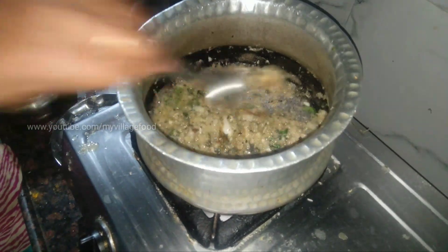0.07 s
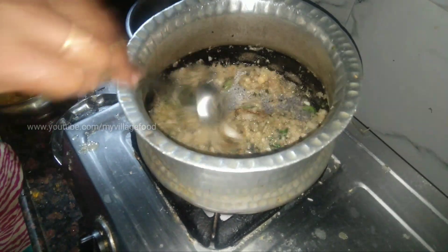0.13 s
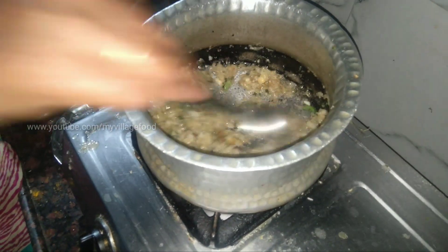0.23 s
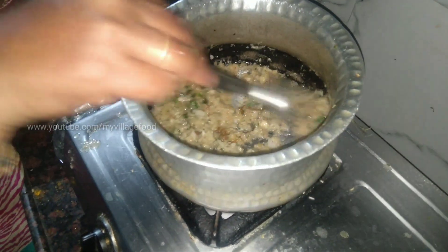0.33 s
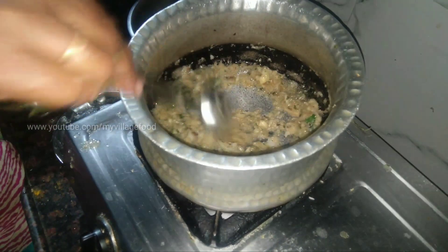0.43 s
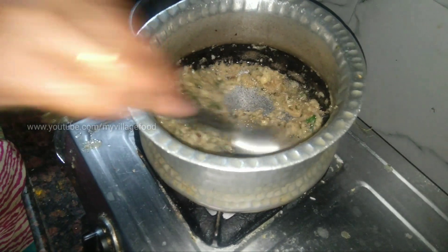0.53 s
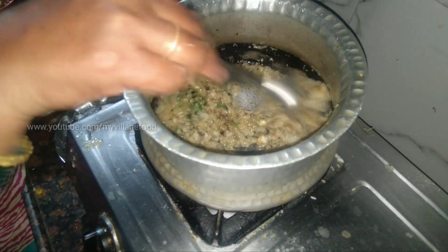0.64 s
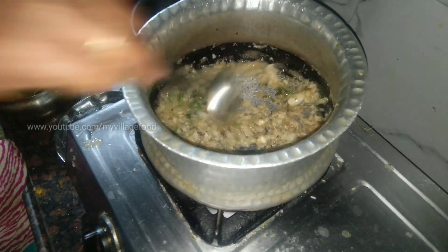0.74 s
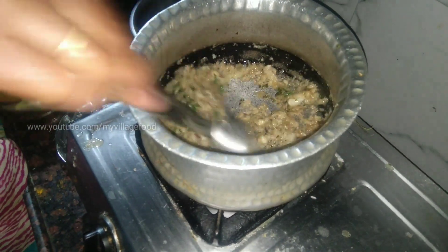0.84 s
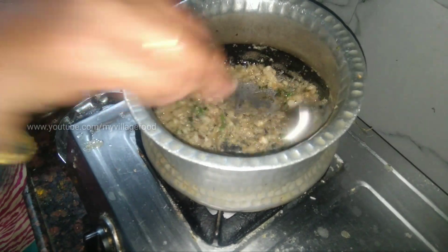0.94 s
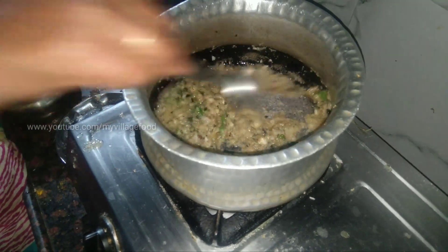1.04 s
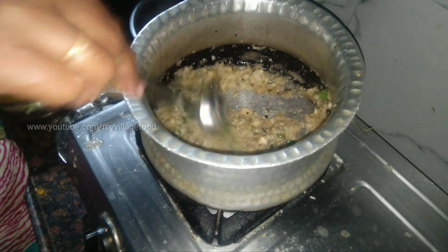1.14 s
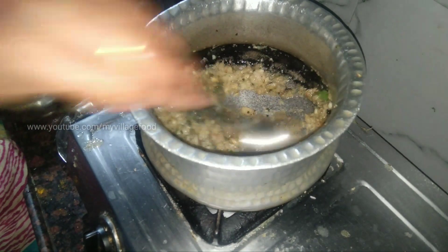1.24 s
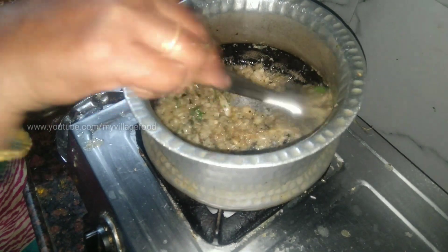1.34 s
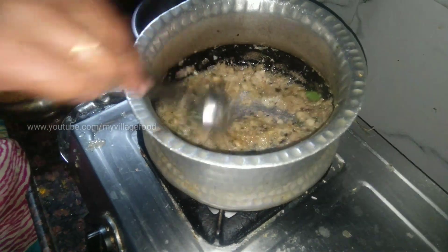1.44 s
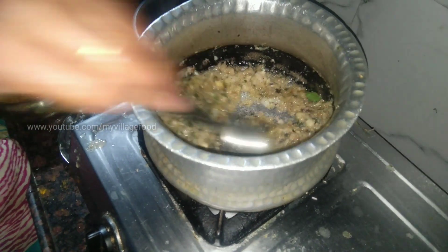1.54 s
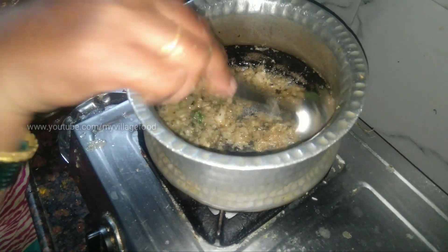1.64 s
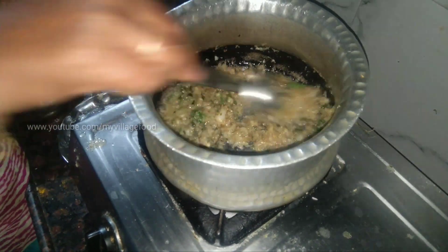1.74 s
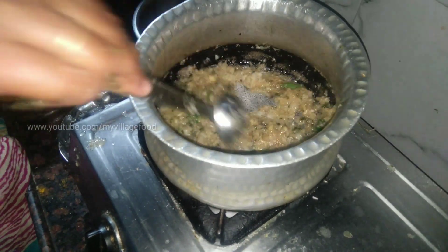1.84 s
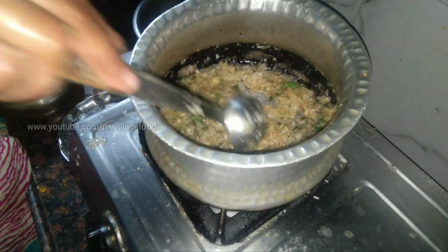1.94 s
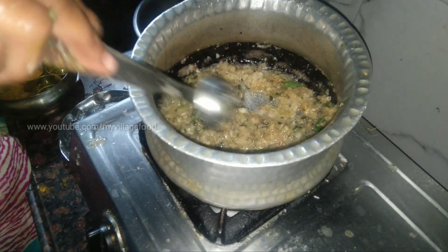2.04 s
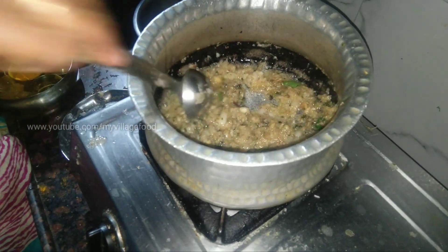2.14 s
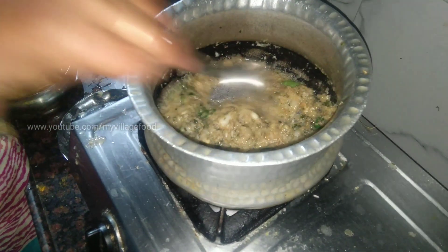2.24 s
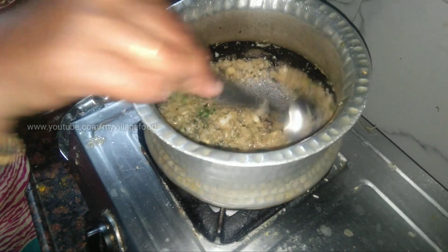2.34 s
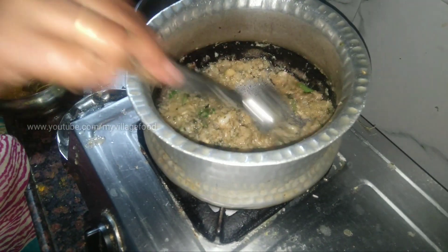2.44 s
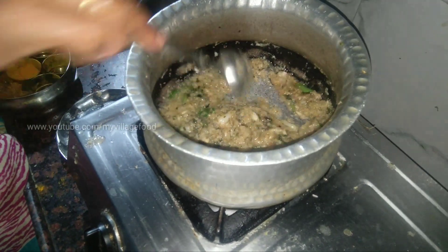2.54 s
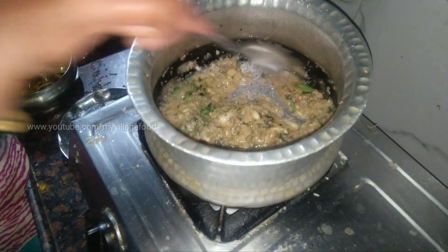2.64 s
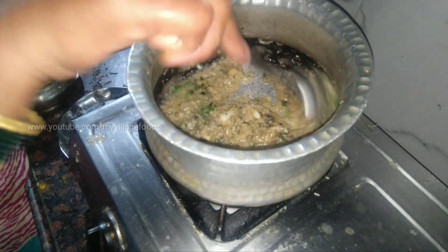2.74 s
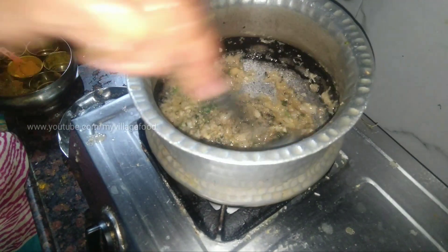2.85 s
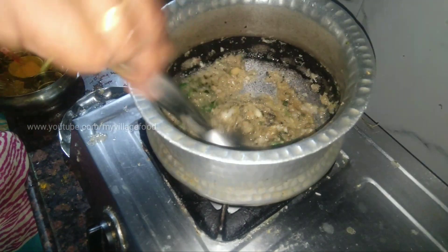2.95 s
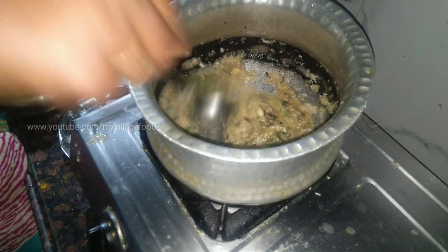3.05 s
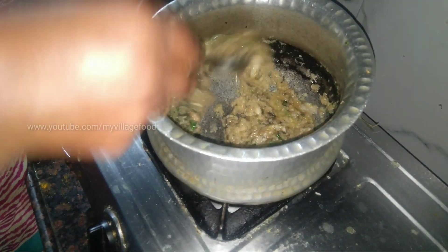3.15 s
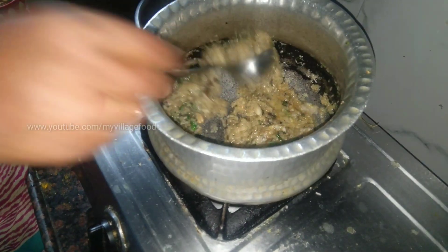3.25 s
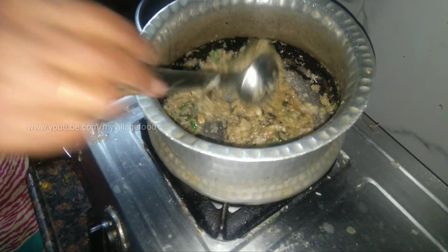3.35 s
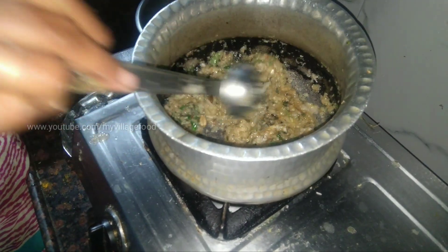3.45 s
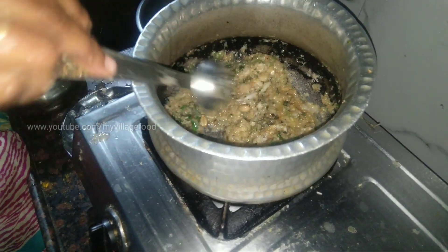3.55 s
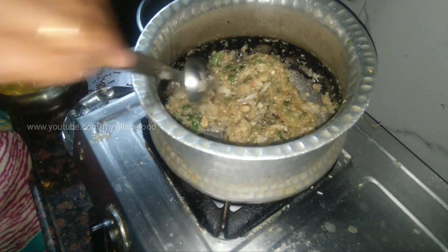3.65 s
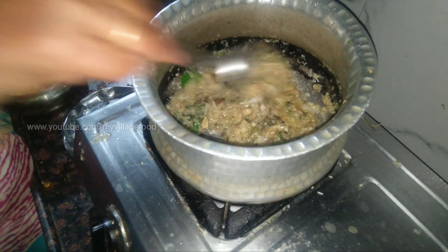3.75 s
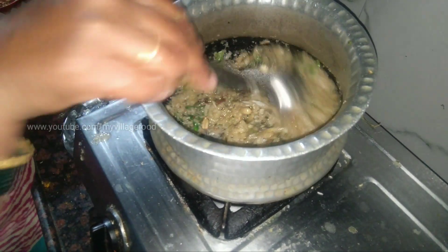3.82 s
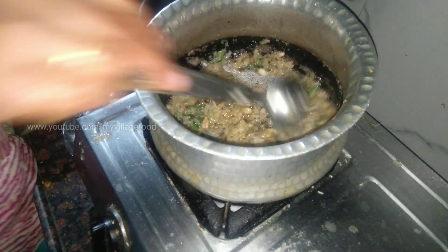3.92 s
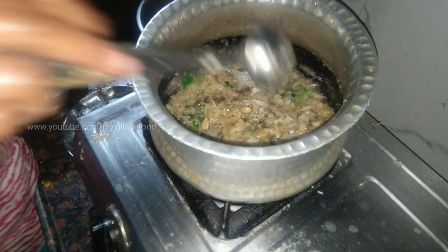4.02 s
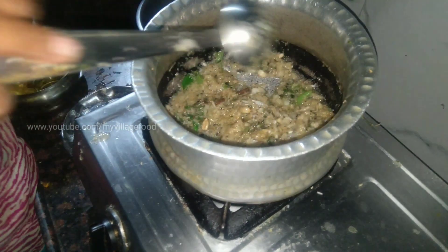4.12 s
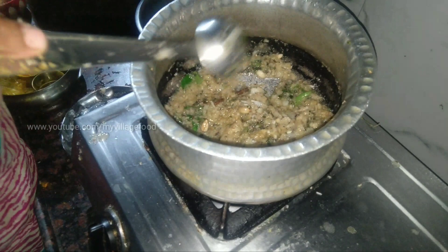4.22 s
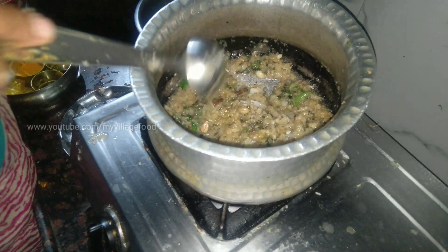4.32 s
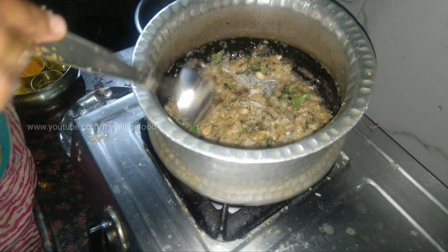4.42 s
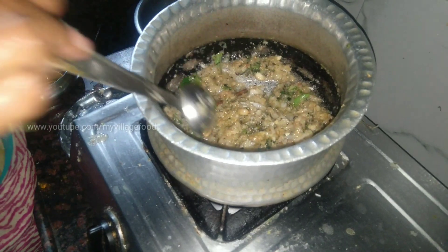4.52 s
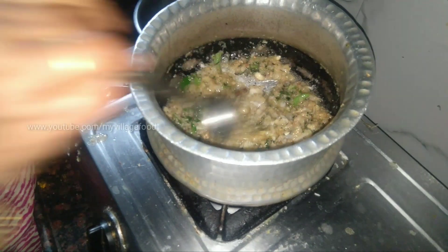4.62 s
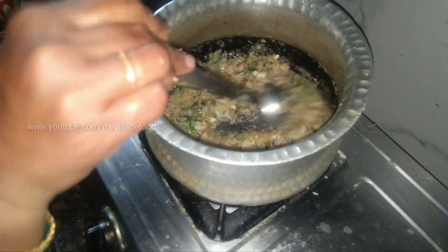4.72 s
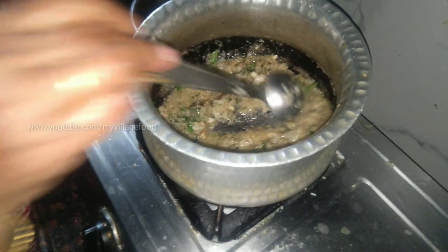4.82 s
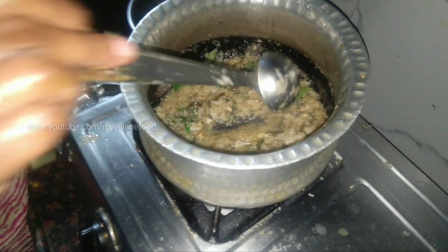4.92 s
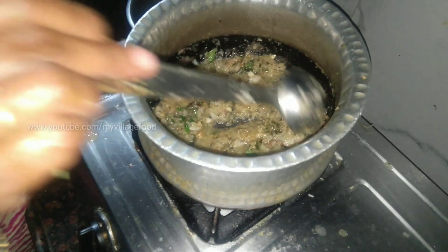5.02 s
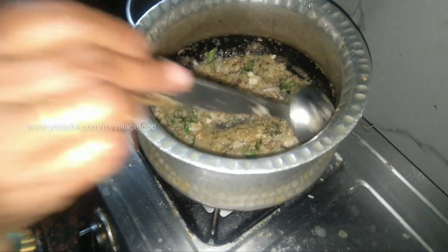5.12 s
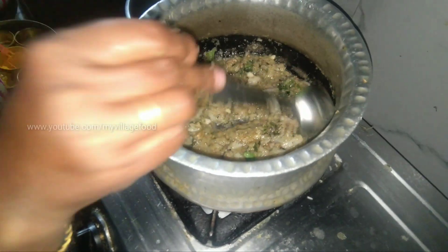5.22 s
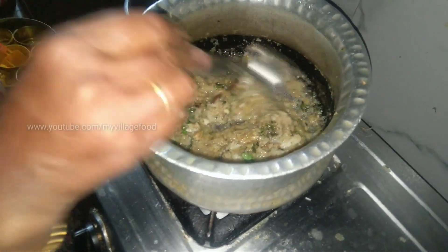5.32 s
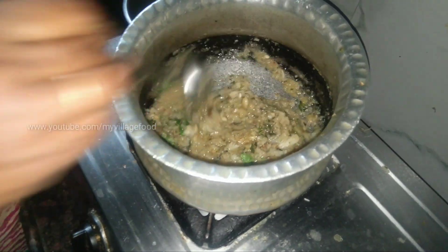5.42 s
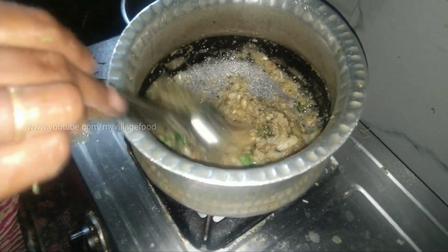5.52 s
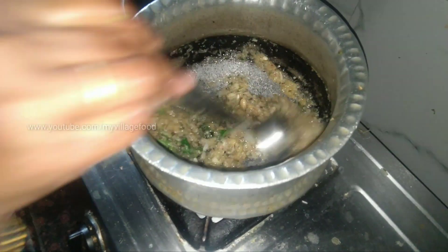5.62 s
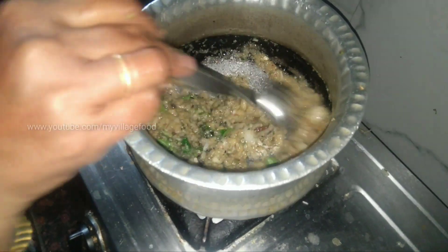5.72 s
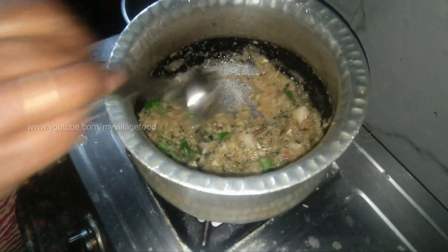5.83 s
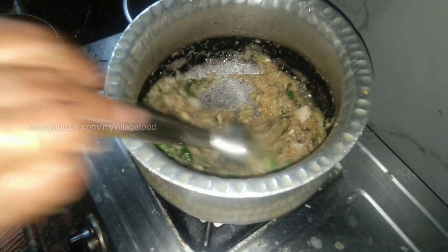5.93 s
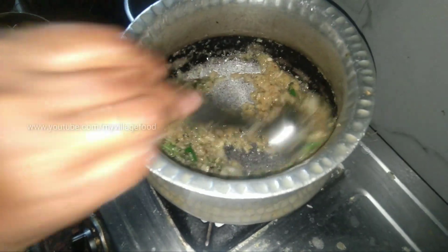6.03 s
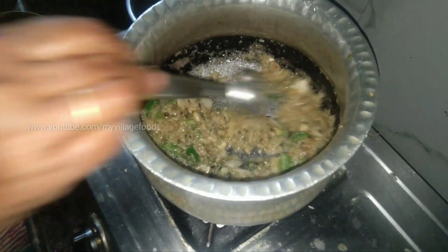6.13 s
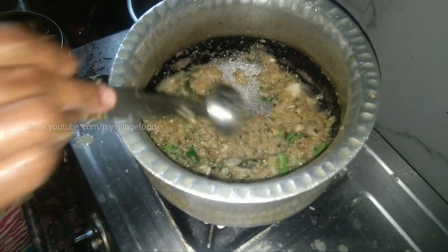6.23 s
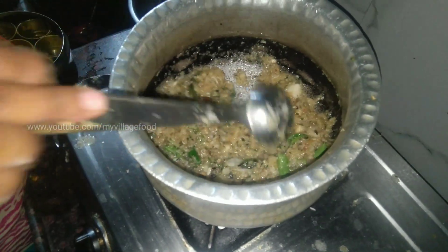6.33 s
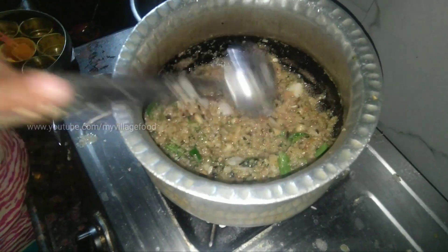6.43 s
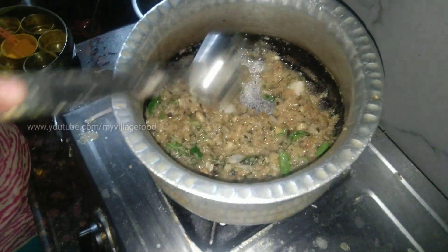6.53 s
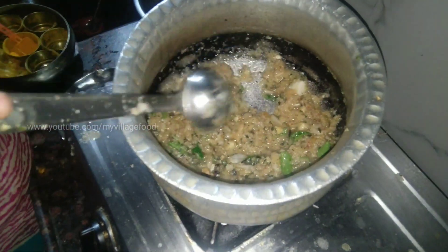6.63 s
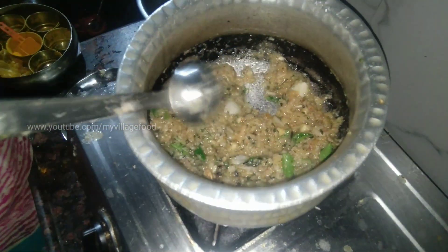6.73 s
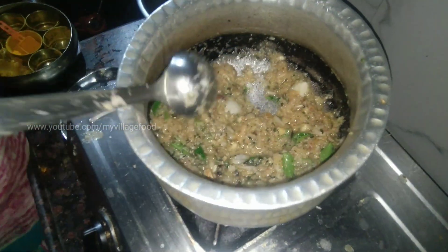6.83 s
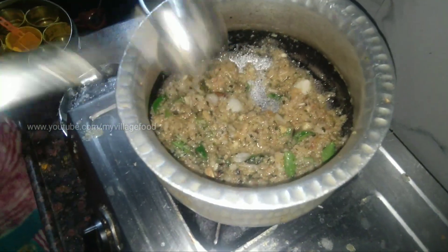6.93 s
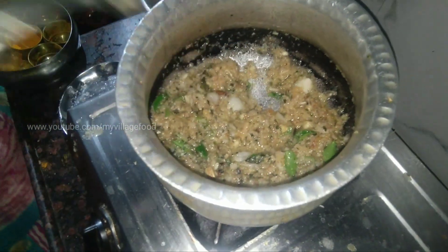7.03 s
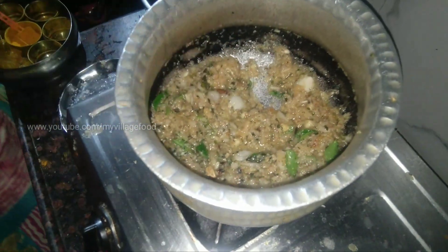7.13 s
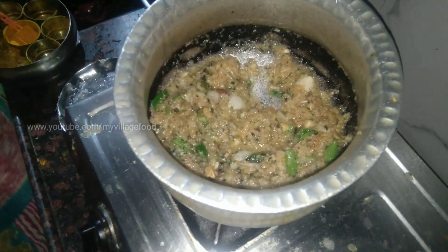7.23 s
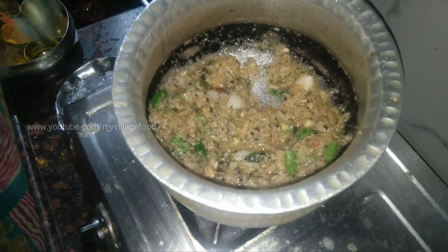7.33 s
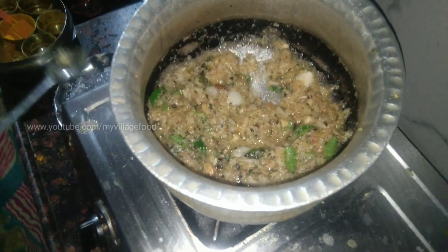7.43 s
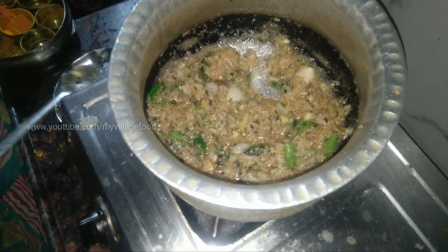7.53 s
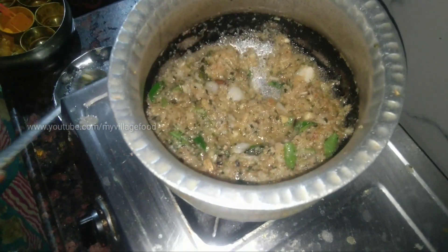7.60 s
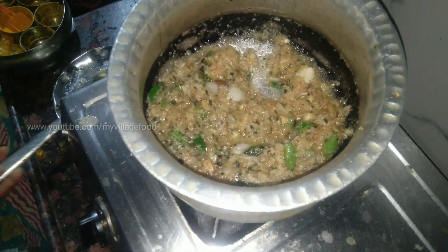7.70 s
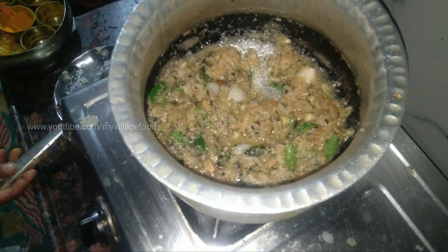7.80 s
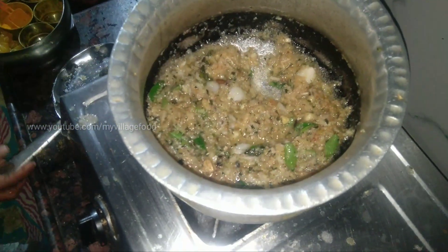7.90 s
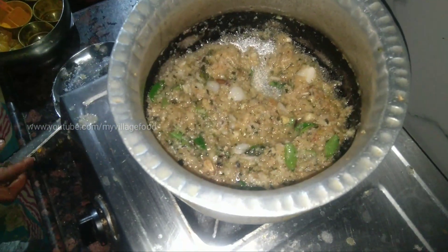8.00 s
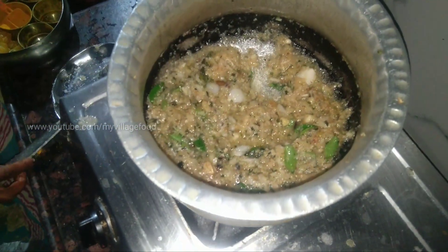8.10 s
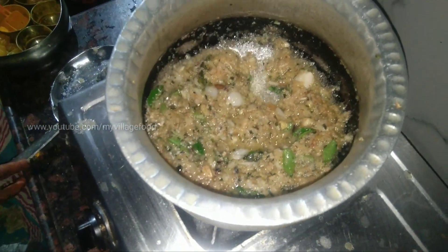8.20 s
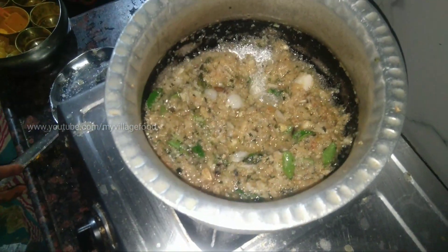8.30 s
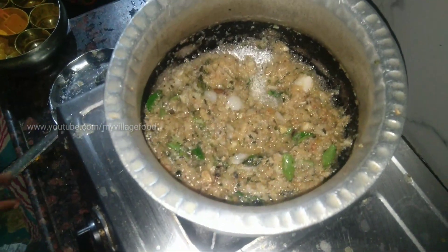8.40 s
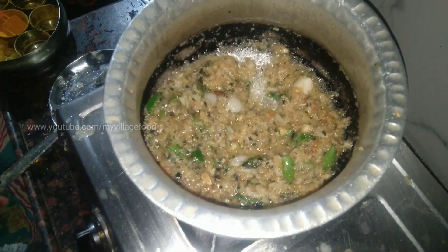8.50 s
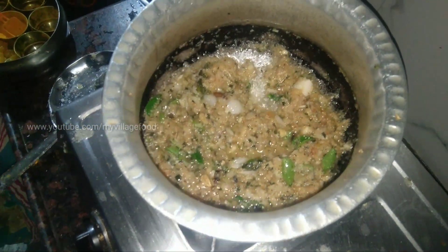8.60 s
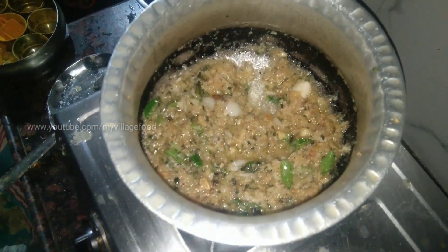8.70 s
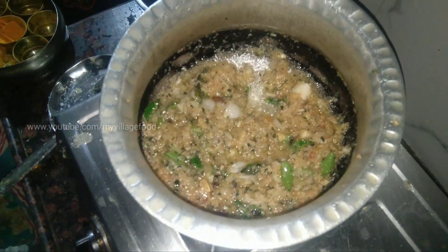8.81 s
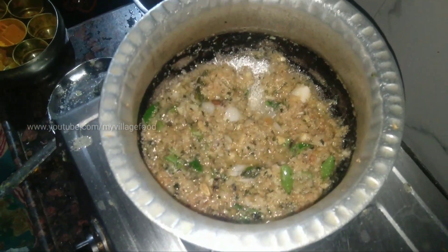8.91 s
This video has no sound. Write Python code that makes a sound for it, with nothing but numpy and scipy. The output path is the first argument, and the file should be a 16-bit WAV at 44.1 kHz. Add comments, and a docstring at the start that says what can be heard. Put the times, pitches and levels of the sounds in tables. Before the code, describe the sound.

A steel ladle stirs spice paste in a thick aluminium pot, heard close up in a small kitchen. For the first two seconds, quick gritty scrapes chatter over the pot bottom with light knocks, above a soft, hollow sizzle of oil. The strokes then become sparser, with firm, briefly ringing knocks at about 2.3, 2.7 and 3.7 seconds, and clinks and a hard knock around 4.6. The sizzle dips and flares as the paste is turned. Busier scraping returns from 5.4 to 6.3 seconds, with a bright clank near 5.5 and a dull thump near 5.9. A last quick clatter comes at about 6.9 seconds, and the stirring dies away. Faint sizzling continues to the end at about nine seconds, with a soft low thump near 8. Underneath, a faint, uneven low rumble comes and goes throughout.

```python
"""A steel ladle scrapes through sizzling spice paste in a thick aluminium pot on a gas stove.
The microphone is close to the pot, in a small kitchen. The ladle's edge chatters on the loaded bottom
and rasps through the paste; its blows knock the pot and ring the free rim and the ladle itself.
Steam bubbles fizz in the oil, coloured by the hollow of the pot. Underneath, a low rumble with a few
soft thumps comes and goes."""
import sys
import numpy as np
from scipy import signal
from scipy.io import wavfile
from scipy.ndimage import uniform_filter1d

SR = 44100
rng = np.random.default_rng(int(sys.argv[2]) if len(sys.argv) > 2 else 0)


def digitize_waveform(pressure):
    """Quantize a signal to 16-bit integers and store it at the path in sys.argv[1].

    Rows of a 2-D input are taken as channels; values are limited to [-1, 1].
    """
    field = np.atleast_2d(pressure).T
    bounded = np.clip(field, -1, 1)
    quanta = np.round(bounded * 32767).astype(np.int16)
    wavfile.write(sys.argv[1], SR, quanta)


N = 395125

# modes of the loaded pot bottom and wall: pitch_hz, level_db, t60_s
POT_MODES = [(205, -17.5, 0.11), (175.6, -18.5, 0.6), (250, -21, 0.057), (306.2, -0.5, 0.19),
             (353.2, 7, 0.11), (409.4, 4, .11), (472, -4, .14), (533.2, 6, 0.13), (600, 12, 0.056),
             (638, -5, 0.093), (650, -3.5, 0.044), (796, -6.5, 0.15), (880, -21, 0.14), (1260, -39, 0.2),
             (1420, -32, 0.17), (1890, -15, 0.18), (2200, -35, 0.13), (2610, -17, 0.13), (3120, -18, .2)]
# ladle blows: start_s, knock_db, rim_hum_db, rim_ring_db, bowl_db, handle_db, crack_db,
# place_rad, bounce_s, mute_after_s
LADLE_BLOWS = [ (.313, -9.5, -41, -55, -70, -44, -41, .62, .013, .065),
               (.476, -18, -40, -57, -70, -60, -36, .73, .0056, .1),
               (.798, -19, -50, -38, -60, -56, -55, .64, .0076, .05),
               (1.006, -24, -47, -46, -65, -65, -47, .98, .007, .1),
               (1.358, -11.5, -47, -47, -66, -57, -45, .69, .011, .078),
               (1.571, -24, -45, -55, -70, -66, -50, .7, .006, .08),
               (1.703, -21, -45, -45, -70, -62, -40, .6, .0098, .1),
               (1.821, -14.5, -39, -48, -67, -66, -50, .72, .0092, .13),
               (2.299, -4.5, -26, -44, -42.5, -56, -31.5, .8, .013, .09),
               (2.703, -5, -33, -49, -58, -70, -36, .58, .012, .084),
               (2.858, -19.5, -41, -54, -70, -72, -45, .53, .011, .085),
               (2.921, -16.5, -49, -64, -70, -72, -57, .62, .0071, .09),
               (2.963, -19.5, -41, -60, -70, -61, -52, .66, .0086, .13),
               (3.743, -4.5, -26.5, -50, -53, -72, -33, .75, .016, .05),
               (4.547, -23, -22.5, -75, -31, -31, -24.5, .61, .006, .05),
               (4.589, -23, -29.5, -70, -38.5, -54, -31, .88, .0043, .04),
               (4.7, -1.5, -27, -46, -63, -45, -26, .8, .0013, .077),
               (5.233, -35, -29, -88, -75, -78, -58, .37, .0059, .09),
               (5.339, -18.5, -38, -70, -81, -78, -56, .94, .0084, .1),
               (5.432, -27, -48, -55, -70, -66, -42, .7, .005, .06),
               (5.454, -14, -18, -25.5, -36, -50.5, -20.5, .37, .002, .049),
               (5.466, -7, -21, -33, -58, -50, -30, .61, .0019, .126),
               (5.603, -22, -37, -48, -70, -64, -49, .56, .0071, .19),
               (5.819, -18.5, -35, -50, -62, -59, -46, .8, .0053, .13),
               (5.89, -12.5, -35, -60, -65, -59, -47, .52, .0018, .14),
               (6.186, -20, -42, -42, -51, -60, -50, .96, .0089, .08),
               (6.837, -6.5, -17, -46, -41.5, -25.5, -16, .8, .011, .08),
               (6.871, -14.5, -34, -38, -58, -48, -33, .44, .008, .087),
               (6.888, -20.5, -40, -39, -67, -63, -30, .9, .0035, .076),
               (6.915, -17, -43, -59, -76, -62, -38, .47, .003, .09),
               (6.991, -25, -33.5, -72, -70, -70, -52, .72, .0044, .11),
               (7.724, -39, -52, -66, -66, -75, -54, .72, .0038, .063)]


def gain_of(db):
    return 10 ** (np.asarray(db) / 20)


def unit_rms(x):
    return x / np.sqrt(np.mean(x ** 2) + 1e-20)


def level_at(spectrum, hz):
    """Level in dB at hz, between (pitch_hz, level_db) points on a log frequency axis."""
    pitch_hz, level_db = np.transpose(spectrum)
    return np.interp(np.log(hz + 1), np.log(pitch_hz + 1), level_db)


def curves(table, t):
    """The columns after a table's time column, read at times t."""
    times, *columns = np.transpose(table)
    return [np.interp(t, times, column) for column in columns]


def slow(rule):
    """A slow control, worked out every millisecond and stretched to every sample."""
    grid = np.arange(0, N / SR + .002, .001)
    return np.interp(np.arange(N) / SR, grid, rule(grid))


def add(mix, start_s, sound):
    part = mix[round(start_s * SR):][:len(sound)]
    part += sound[:len(part)]


def swell_db(t, peak_s, rise_s, fall_s):
    """A round-topped swell, 10 dB down at rise_s before its peak and at fall_s after."""
    return -10 * np.maximum((peak_s - t) / rise_s, (t - peak_s) / fall_s) ** 1.45


def ring(modes, drive_db=0, place=0, t60_scale=1, size=7000):
    """Dying sines of a struck object; the place of the blow weights each mode."""
    hz, db, t60 = np.transpose(modes)[:, :, None]
    t = np.arange(size) / SR
    weight = gain_of(db + drive_db) * np.cos(place * np.arange(len(modes)))[:, None]
    return (weight * gain_of(-60 * t / (t60 * t60_scale)) * np.sin(2 * np.pi * hz * t)).sum(0)


def noise(colour_db, patchy_db, flicker_db, size):
    """Unit-level noise shaped by colour_db(hz, t), with narrow lasting patches and a broad flicker."""
    hop = size // 4
    frames, hz = N // hop + 5, np.fft.rfftfreq(size, 1 / SR)[:, None]
    real, imag, patches = rng.standard_normal((frames, len(hz), 3)).T
    patches = unit_rms(uniform_filter1d(uniform_filter1d(patches, size=4, axis=0), size=15, axis=1))
    patches /= 1 + (hz / 6000) ** 4  # the finest hiss stays even
    flicker = unit_rms(uniform_filter1d(rng.standard_normal(frames), size=3))
    level_db = colour_db(hz, np.arange(frames) * hop / SR) + patchy_db * patches + flicker_db * flicker
    spectra = (real + 1j * imag) * gain_of(level_db)
    return unit_rms(signal.istft(spectra, nperseg=size, noverlap=size - hop)[1][:N])


def stirring(t):
    """Strokes over light dragging: gains of chatter, rasp and rasp treble, and the rasp's pitch."""
    # scraping strokes: peak_s, rise_s, fall_s, chatter_db, rasp_db, treble_db, resonance_hz
    strokes = [ (0.0, .05, .06, -22.5, -36, -43, 2980), (.13, .12, .06, -19.5, -36.5, -35.5, 3400),
               (.32, .007, .11, -27, -39, -43.5, 3100), (.43, .08, .08, -20.5, -40, -39, 3350),
               (.68, .21, .09, -33, -44, -52, 3250), (.83, .035, .11, -24, -37, -42, 3400),
               (1.02, .012, .21, -26, -45, -52, 2900), (1.15, .08, .105, -21.5, -38, -36, 3250),
               (1.37, .03, .05, -23.5, -40.5, -45, 2950), (1.47, .06, .11, -19.5, -40, -41, 3400),
               (1.715, .01, .08, -26, -41, -51, 2860), (1.86, .035, .025, -19.5, -41.5, -47, 2860),
               (2.322, .005, .065, -19.5, -39, -55, 3300), (2.42, .05, .022, -28, -45, -54, 2900),
               (2.724, .005, .09, -26.5, -47, -58, 2500), (2.9, .07, .21, -28, -55, -62, 2400),
               (3.17, .11, .06, -31, -46, -50, 2850), (3.41, .08, .07, -43, -50, -54, 2580),
               (3.766, .005, .06, -18.5, -39, -60, 2900), (4.562, .005, .05, -26, -43, -35, 3070),
               (4.72, .008, .03, -18.5, -37, -40, 2670), (4.77, .03, .015, -31, -34.5, -51, 2230),
               (5.37, .04, .21, -30.5, -49, -60, 2500), (5.465, .04, .03, -16, -35, -40, 3370),
               (5.61, .06, .055, -23.5, -42, -42, 2940), (5.825, .008, .11, -27, -52, -52, 3480),
               (5.87, .05, .055, -23, -35, -38, 3400), (6.215, .04, .045, -22.5, -48, -55, 3080),
               (6.24, .03, .022, -28.5, -41, -37, 2940), (6.86, .005, .06, -18.5, -42, -42, 2750),
               (6.89, .03, .11, -27.5, -40, -55, 2760)]
    # dragging between strokes: time_s, chatter_db, rasp_db, treble_db, resonance_hz
    dragging = [(0, -55, -47, -50, 2700), (1.6, -52, -47, -54, 2400), (2.0, -43, -45, -48, 2950),
                (2.27, -47, -50, -58, 2540), (2.65, -57, -58, -65, 2800), (2.9, -48, -54, -64, 2200),
                (3.1, -50, -46, -56, 2850), (3.3, -52, -43, -51, 2600), (3.7, -57, -55, -65, 2650),
                (3.97, -48, -46, -50, 3350), (4.25, -56, -60, -62, 2750), (4.52, -62, -70, -70, 2850),
                (4.8, -43, -54, -60, 2300), (5.2, -45, -49, -54, 2750), (5.7, -42, -46, -51, 2950),
                (5.95, -44, -48, -52, 2450), (6.13, -46, -43, -52, 3050), (6.4, -47, -46, -55, 2800),
                (6.7, -50, -50, -61, 2500), (6.81, -62, -62, -63, 2880), (7.25, -56, -58, -70, 2800),
                (7.6, -110, -70, -90, 2800), (8.96, -120, -110, -130, 2800)]
    peak_s, rise_s, fall_s, chatter_db, rasp_db, treble_db, stroke_hz = np.transpose(strokes)[:, :, None]
    *drag_db, drag_hz = curves(dragging, t)
    press_db = np.maximum(swell_db(t, peak_s, rise_s, fall_s), -150)
    grind_db = 1.3 * press_db  # rasp climbs and drops faster than chatter
    stroke_db = chatter_db + press_db, rasp_db + grind_db, treble_db + grind_db
    powers = [gain_of(2 * np.vstack(pair)) for pair in zip(stroke_db, drag_db)]
    sagged_hz = stroke_hz * (1 + np.maximum(.017 * press_db, -.25))  # sinks as pressure eases
    pitch_hz = np.average(np.vstack([sagged_hz, drag_hz]), axis=0, weights=powers[1])  # loudest rasp leads
    return *(np.sqrt(power.sum(0)) for power in powers), pitch_hz


def chatter():
    """The ladle edge sticks and slips over the bottom: uneven soft knocks at changing places."""
    slips_per_s, places = 800, np.linspace(0.3, 2.8, 6)
    slipping = rng.random(N) < slips_per_s / SR
    slips = slipping * gain_of(2 * np.minimum(rng.exponential(1, N), 4))
    spot = rng.integers(0, len(places), N)
    contact = np.hanning(70) / 35  # paste cushions each slip
    contact[0] = 0.22  # a little bare steel still meets the metal
    mode_hz = np.array(POT_MODES)[:, :1]
    drive_db = np.maximum(-5 * np.log2(mode_hz / 430) ** 2, -4.5)  # sliding drives the middle modes best
    taps = [np.convolve(ring(POT_MODES, drive_db, place, size=4000), contact) for place in places]
    rms = np.sqrt(np.mean(slips ** 2) * np.mean([(tap ** 2).sum() for tap in taps]))
    push = slips * slow(lambda t: stirring(t)[0])
    return sum(signal.oaconvolve(push * (spot == k), tap)[:N] for k, tap in enumerate(taps)) / rms


def hollow_db(hz):
    """The air in the pot resonates and colours the hiss made inside it."""
    # peaks and dips of the hollow: centre_hz, width_hz, level_db
    resonances = [(630, 30, -21.5), (1150, 67, -3), (1399, 50, 20.5), (1652, 120, -7), (2050, 280, 3.5),
                  (2540, 34, 6.5), (2870, 42, 9), (3370, 150, 9), (3720, 270, 4.5), (3997, 750, 1.5),
                  (5255, 400, 4.5), (6340, 360, -2.5), (8040, 2050, 15)]
    return sum(db / (1 + (2 * (hz - centre) / width) ** 2) for centre, width, db in resonances)


def rasp():
    """Paste grinds under the ladle: patchy hiss with two resonances that glide as the bowl tilts."""
    # spectrum of grinding paste: pitch_hz, level_db
    spectrum = [(700, 0), (1400, 0.5), (1700, -3.5), (2300, 4.5), (3200, 1), (5400, 1), (6300, -9.5),
                (8000, -15), (12000, -11.5), (15600, -26)]

    def colour_db(hz, t):
        _, body, treble, pitch_hz = stirring(t)
        wander = .035 * unit_rms(uniform_filter1d(rng.standard_normal(len(t)), size=16))
        lower_db = 9 * np.exp(-(np.log((hz + 1) / pitch_hz) / .11) ** 2)
        upper_db = 7.3 * np.exp(-((np.log((hz + 1) / 4700) - wander) / .069) ** 2)
        shelf_db = 20 * np.log10(treble / body) / (1 + (3800 / (hz + 1)) ** 8)
        return level_at(spectrum, hz) + 0.8 * hollow_db(hz) + lower_db + upper_db + shelf_db
    return slow(lambda t: stirring(t)[1]) * noise(colour_db, patchy_db=3.6, flicker_db=2.2, size=1024)


def frying(t):
    """Gain of the sizzle: a slow level, plus a flare whenever a knock shakes the paste."""
    # frying as paste is turned onto hot metal: time_s, level_db
    levels = [(0, -38.5), (1.2, -40), (1.4, -44), (1.68, -43), (1.83, -52), (2.0, -55), (2.3, -59),
              (3.0, -58), (3.08, -47), (3.3, -43.5), (3.5, -48.5), (3.73, -57), (4.2, -58), (4.5, -56),
              (4.85, -50), (5.33, -59), (5.43, -45.5), (6.25, -42), (6.5, -50), (6.85, -53), (7.35, -62),
              (7.55, -51.5), (7.95, -59), (8.3, -55.5), (8.96, -59)]
    flare_db, fade_db_per_s = -43, 22
    flare_power = sum(gain_of(2 * (knock_db + flare_db - fade_db_per_s * abs(t - start_s))) * (t > start_s)
                      for start_s, knock_db, *_ in LADLE_BLOWS)
    return np.sqrt(gain_of(2 * curves(levels, t)[0]) + flare_power)


def sizzle():
    """Dense fizz of steam bubbles, heard through the hollow of the pot, with sparse tiny pops."""
    # spectrum of the fizz: pitch_hz, level_db
    spectrum = [(130, -37), (220, -15), (344, 5), (465, -7), (597, 9.5), (1200, -24), (1410, -16.5),
                (1620, -16.5), (2820, -8), (3190, -20.5), (5260, -16), (6510, -25), (8070, -27),
                (11300, -14), (15600, -19)]
    fizz = noise(lambda hz, t: level_at(spectrum, hz) + hollow_db(hz) - 40 * (hz < 200),
                 patchy_db=2.8, flicker_db=1, size=1024)
    pops_per_s, pop_hz = 120, 9000
    bursts = gain_of(3.5 * np.minimum(rng.exponential(1, N), 3)) * (rng.random(N) < pops_per_s / SR)
    t = np.arange(200) / SR
    pop = np.sin(2 * np.pi * pop_hz * t) * np.exp(-t / 0.00015)
    pops = unit_rms(signal.oaconvolve(bursts, pop)[:N])
    return slow(frying) * (fizz + gain_of(-17) * pops)


def rumble():
    """Lumpy low noise, with swells that lack its deepest part."""
    # spectrum of the rumble: pitch_hz, level_db
    spectrum = [(12, -53.5), (20, -41), (40, -5.5), (70, 3), (178, 5.5), (200, 3.5), (242, -21.5),
                (300, -7), (390, -14), (660, -120)]
    # slow course of the deep rumble: time_s, level_db
    deep_levels = [(0, -50), (1.2, -54), (2.0, -48), (2.7, -48), (3.1, -43), (3.6, -51), (4.1, -47),
                   (4.5, -53), (4.9, -37), (5.3, -39), (5.6, -40), (6.0, -36), (6.68, -35), (6.82, -46),
                   (7.1, -42), (7.4, -52), (8.0, -56), (8.4, -52), (8.96, -53)]
    # swells of the upper rumble: peak_s, level_db, half_width_s
    swells = [(.1, -41, .1), (.4, -41, .06), (.75, -37, .08), (1.1, -40, .1), (1.83, -38, .07),
              (2.36, -34, .09), (2.73, -36, .1), (3.2, -38, .08), (3.39, -38, .05), (3.6, -41, .06),
              (3.98, -39, .07), (4.75, -30, .09), (5.0, -40, .15), (5.45, -40, .12), (5.9, -30, .03),
              (6.16, -38, .09), (6.92, -24, .06), (7.05, -40, .1), (8.075, -38, .03), (8.3, -48, .12),
              (8.9, -46, .06)]

    def colour(bass_db):
        return lambda hz, t: level_at(spectrum, hz) + bass_db / (1 + (hz / 100) ** 4)
    deep = noise(colour(bass_db=1.5), patchy_db=3, flicker_db=2.1, size=2048)
    upper = noise(colour(bass_db=-14), patchy_db=3.5, flicker_db=1.4, size=2048)
    deep *= gain_of(slow(lambda t: curves(deep_levels, t)[0]))
    upper *= slow(lambda t: sum(gain_of(db + swell_db(t, s, width, width)) for s, db, width in swells))
    return deep + upper


def bounced(knock, bounce_s):
    """The ladle lands three times within bounce_s, then paste damps the pot."""
    t = np.arange(len(knock)) / SR
    rebounds = sum(np.interp(t - share * bounce_s, t, knock, left=0) for share in (.45, 1))
    burst = knock + 0.73 * rebounds
    burst *= gain_of(-5 / (1 + np.exp(-(t - bounce_s - .005) / .0032)))
    return burst / abs(burst).max()


def blows():
    """Each blow cracks, knocks the pot, and rings rim and ladle until paste or hand mutes them."""
    # modes of the pot's free rim: pitch_hz, level_db, t60_s
    rim_modes = [(470, 0, .7), (953, -11, .8), (1995, -9, .35), (3440, 0, .19), (4016, -14, .2),
                 (4856, -7, .14)]
    # modes of the ladle's bowl: pitch_hz, level_db, t60_s
    bowl_modes = [(2859, -11, .1), (3074, 0, .5), (3914, -12, .07), (5130, -7, .06), (5534, -3, .18),
                  (6853, -8, .14), (7962, -2, .045), (9000, -14, .04), (11300, -14, .04)]
    # modes of the ladle's flat handle: pitch_hz, level_db, t60_s
    handle_modes = [(3570, 2, .06), (5010, -5, .08), (5460, -3, .08), (5690, 0, .1), (6510, -1, .045),
                    (6930, -2, .04), (7080, -2, .04), (7650, -4, .04), (8090, -5, .05)]
    out, t = np.zeros(N), np.arange(7000) / SR
    white = rng.standard_normal((len(LADLE_BLOWS), len(t)))
    cracks = signal.lfilter(*signal.butter(1, [900, 8000], "band", fs=SR), white)
    cracks *= gain_of(-60 * t / 0.031) + 0.06 * gain_of(-60 * t / 0.18)
    cracks *= 1.4 * (1 - np.exp(-t / .0015))  # paste blunts the first instant
    bowl, handle, rim_hz = ring(bowl_modes), ring(handle_modes), np.array(rim_modes)[:, :1]
    for blow, crack in zip(LADLE_BLOWS, cracks):
        start_s, knock_db, hum_db, ring_db, bowl_db, handle_db, crack_db, place, bounce_s, mute_s = blow
        knock = bounced(ring(POT_MODES, place=place, t60_scale=.78), bounce_s)  # paste shortens the ring
        # a soft touch reaches only the rim's low modes
        rim = ring(rim_modes, drive_db=level_at([(470, hum_db), (3400, ring_db)], rim_hz))
        metal = rim + gain_of(bowl_db) * bowl + gain_of(handle_db) * handle
        metal *= (1 - np.exp(-t / .00089)) * gain_of(-900 * np.maximum(t - mute_s, 0))
        add(out, start_s, gain_of(knock_db) * knock + gain_of(crack_db) * crack + metal)
    return out


def thumps():
    """Soft low thumps, each a sine that dies within a few cycles."""
    # thumps under the stirring: start_s, level_db, pitch_hz, decay_cycles
    events = [(4.199, -31.5, 185, 1.7), (4.266, -39.5, 183, 5.8), (4.384, -33, 188, 4.4),
              (4.437, -42, 205, 4.4), (5.889, -10.5, 286, 1.35), (7.279, -36, 194, 1.4),
              (7.501, -39, 72.7, 4.1), (8.054, -24.5, 93, 1.7), (8.153, -41, 95.5, 2),
              (8.538, -35, 117, 0.83)]
    out = np.zeros(N)
    for start_s, level_db, pitch_hz, decay_cycles in events:
        cycles = np.arange(0, 3 * decay_cycles / pitch_hz, 1 / SR) * pitch_hz
        envelope = gain_of(level_db) * np.exp(-(cycles / decay_cycles) ** 2)
        add(out, start_s, envelope * np.sin(2 * np.pi * cycles))
    return out


def kitchen(sound, t60_s=0.29):
    """Short dull tail of a small room: sparse reflections of random sign."""
    taps = np.zeros(SR // 2)
    slots = np.arange(300, SR // 2 - 20, 20)
    taps[slots + rng.integers(0, 20, len(slots))] = rng.choice([-1., 1.], len(slots))
    taps *= gain_of(-60 * np.arange(len(taps)) / SR / t60_s)
    tail = signal.lfilter(*signal.butter(1, 1800, fs=SR), taps / np.linalg.norm(taps))
    return signal.fftconvolve(sound, tail)[:N]


def scene():
    """Close to the stove, in mono: the small pot radiates little bass; the room answers the metal."""
    metal = signal.lfilter(*signal.butter(2, 110, "high", fs=SR), blows() + chatter())
    return (metal + gain_of(-11.5) * kitchen(metal) + rasp() + sizzle() + rumble() + thumps())[None]


def record(dry):
    """The microphone drops the deepest bass; the treble ends at a steep band limit."""
    low_cut_hz, band_limit_hz = 50, 15700
    thin = signal.sosfilt(signal.butter(3, low_cut_hz, "high", fs=SR, output="sos"), dry)
    lowpass = signal.firwin(511, band_limit_hz, window=("kaiser", 9), fs=SR)
    return signal.oaconvolve(thin, lowpass[None], "same")


dry = scene()
out = record(dry)
digitize_waveform(out)
```